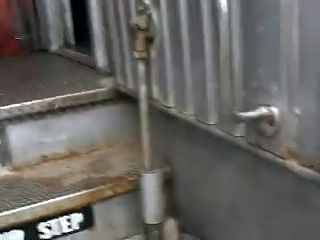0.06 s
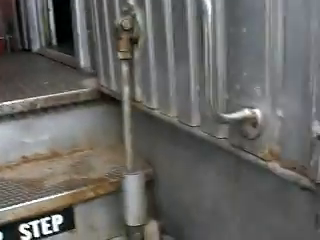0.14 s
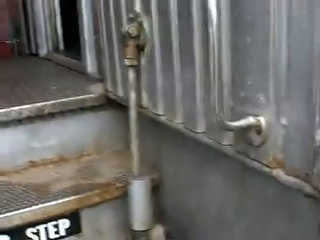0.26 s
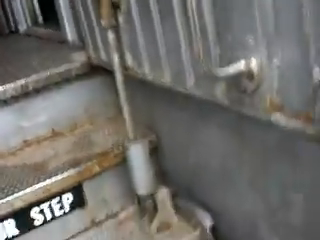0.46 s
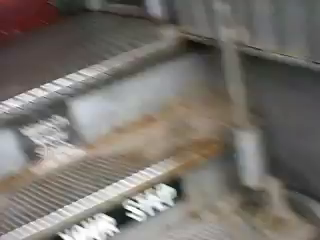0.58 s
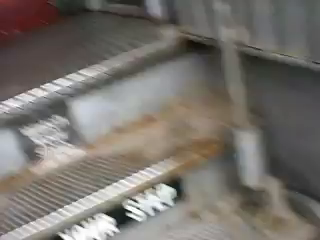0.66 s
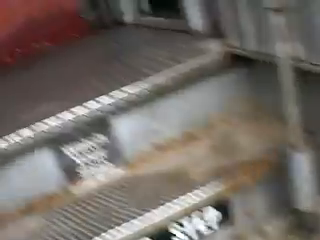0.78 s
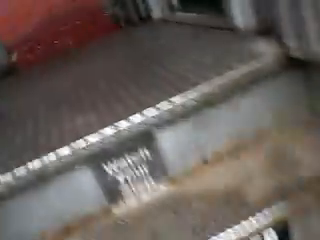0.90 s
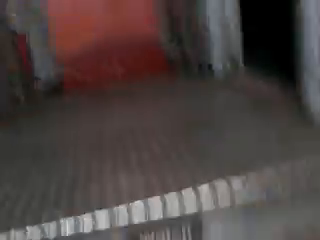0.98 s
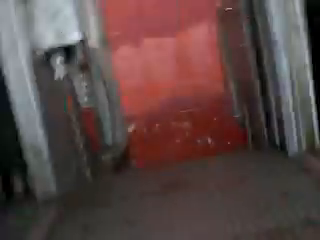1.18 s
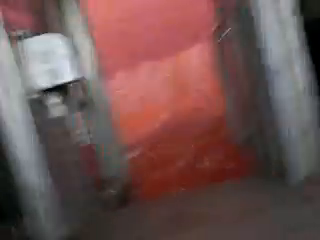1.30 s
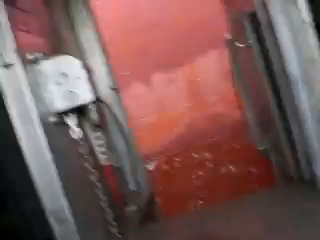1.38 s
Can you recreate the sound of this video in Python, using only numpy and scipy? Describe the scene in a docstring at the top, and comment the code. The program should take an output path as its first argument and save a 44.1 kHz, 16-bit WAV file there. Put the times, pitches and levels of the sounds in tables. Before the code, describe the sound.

Three close, ringing footsteps on metal as someone climbs aboard a train: a loud thud and clank, a softer footfall, then a clash with a small clink. The hollow stairwell booms low against a faint outdoor background.

```python
"""On the steel steps of a rail car, close by, someone climbs aboard.
A boot thuds onto the lowest step, which clanks; a lighter footfall follows on the next tread,
then the platform plate clashes and rings. Each hit is a noisy wash of dense steel modes plus a few
clear tones. The hollow stairwell booms under the weight; small ticks and rattles sound over
a faint hiss and outdoor background."""
import sys
import numpy as np
from scipy import signal
from scipy.io import wavfile
from scipy.ndimage import uniform_filter1d

SR = 44100
rng = np.random.default_rng(int(sys.argv[2]) if len(sys.argv) > 2 else 0)


def dump_mix(stems):
    """Bounce the given channels to the path in sys.argv[1] as a 16-bit WAV at rate SR."""
    frames = np.atleast_2d(stems).T  # one column per channel
    limited = np.clip(frames, -1, 1)  # hard clip at full scale
    pcm = np.round(limited * 32767).astype(np.int16)
    wavfile.write(sys.argv[1], SR, pcm)


N = 63945
TIME = np.arange(N) / SR

# The sole's thud, then the clank: start_s, attack_s, hold_s, crack_db, tail_db, decay_ratio
SOLE_HIT = (.223, .004, .02, -20, -22, .4)
STEP_HIT = (.2495, .0005, .003, 10.5, -12, 1.05)
# Their tone colours, per half octave: band_hz, level_db
SOLE_COLOUR = [(60, -48), (150, -32), (300, -27), (600, -29), (1200, -35), (2400, -50), (5000, -50),
               (11000, -64)]
STEP_COLOUR = [(60, -48), (110, -34), (190, -27), (330, -27), (600, -30.5), (950, -33), (1500, -28.5),
               (2400, -29.5), (5000, -36), (7500, -40), (11500, -56)]
# The step's clear ring: pitch_hz, relative_db, t60_s
STEP_MODES = [(141, -28, .9), (169, -24, .9), (180, -21, 1.0), (193, -24, 1.0), (279, -25, .75),
              (330, -28, .6), (410, -30, .8), (526, -26, .45), (577, -30, .7), (612, -26, .35),
              (813, -35, .6), (921, -33, .42), (1283, -33, .4), (1318, -25, .24), (1459, -27, .24),
              (1525, -26, .24), (1787, -30, .23), (2229, -29, .17), (3020, -39, .35), (3302, -33, .27),
              (5950, -42, .25), (7150, -38, .16)]
def lowest_step(bank):
    """The sole lands with a dull thud, then the steel step clanks under the boot."""
    impact = footfall(bank, SOLE_HIT, SOLE_COLOUR) + footfall(bank, STEP_HIT, STEP_COLOUR)
    return impact + ringing(STEP_HIT[0], STEP_MODES, attack_s=.003, lag_cycles=1.5, gain_db=-1.2)


# The lighter hit: start_s, attack_s, hold_s, crack_db, tail_db, decay_ratio
TREAD_HIT = (.792, .0012, .004, 0, -16, .77)
# Its tone colour: band_hz, level_db
TREAD_COLOUR = [(60, -55), (180, -36), (300, -41), (520, -36.5), (850, -33), (1400, -35), (2300, -36),
                (3500, -34.5), (5200, -42), (7500, -57), (11500, -68)]
# The tread's clear ring: pitch_hz, relative_db, t60_s
TREAD_MODES = [(183, -28, .6), (223, -29, .55), (396, -35, .65), (629, -34, .7), (826, -29, .27),
               (887, -33, .3), (1019, -34, .3), (1310, -33, .22), (1340, -29, .3), (1542, -35, .22),
               (1655, -33, .22), (2040, -39, .2), (2756, -39, .17), (3430, -32, .18)]
def next_tread(bank):
    """A lighter footfall sets the next tread ringing briefly."""
    impact = footfall(bank, TREAD_HIT, TREAD_COLOUR)
    return impact + ringing(TREAD_HIT[0], TREAD_MODES, attack_s=.005, gain_db=-.5)


# The clash: start_s, attack_s, hold_s, crack_db, tail_db, decay_ratio
PLATE_HIT = (1.035, .0015, .015, -6, -10, .88)
# Its tone colour: band_hz, level_db
PLATE_COLOUR = [(60, -54), (150, -39), (280, -27), (480, -29), (800, -28), (1300, -30), (2400, -36),
                (4200, -30), (6000, -32), (7800, -37), (10000, -32), (12000, -44)]
# The plate's clear ring: pitch_hz, relative_db, t60_s
PLATE_MODES = [(108, -31, 1.1), (151, -32, 1.4), (244, -26, .7), (258, -32, 1.0), (312, -25.5, 1.0),
               (348, -28, .8), (374, -27.5, .85), (457, -35, .9), (553, -28, .38), (791, -37, .55),
               (835, -29, .36), (881, -27, .42), (1240, -33, .22), (1312, -28, .24), (1394, -36, .4),
               (4864, -32, .16), (5135, -36, .18), (9687, -36, .18), (9880, -37, .19)]
def platform_plate(bank):
    """The boot strikes the plate: a bright clash, with low tones blooming after it."""
    impact = footfall(bank, PLATE_HIT, PLATE_COLOUR)
    return impact + ringing(PLATE_HIT[0], PLATE_MODES, attack_s=.002, lag_cycles=18, gain_db=-.5)


# Decay of the dense steel modes, scaled by each hit's decay_ratio: band_hz, base_t60_s
BODY_DECAY = [(100, .55), (300, .42), (700, .34), (1400, .32), (2800, .26), (5500, .2), (11000, .17)]
TAIL_DECAY = [(100, 1.8), (300, 1.55), (700, 1.08), (1400, .68), (2800, .3), (5500, .18), (11000, .12)]
def footfall(bank, hit, colour, crack_s=.003, lag_cycles=1.0):
    """A crack, then countless steel modes that die fast and leave a low tail; the lows build later."""
    start, attack, hold, crack_db, tail_db, decay_ratio = hit
    sample_age, out = since(start), 0
    age = sample_age[::16]  # envelopes move on a coarser time grid
    crack = from_db(crack_db) * np.exp(-age / crack_s)
    for hz, noise in bank:
        rise = 1 - np.exp(-age / (attack + lag_cycles / hz))
        body = decay(age - hold, decay_ratio * at_hz(BODY_DECAY, hz))
        tail = from_db(tail_db) * decay(age, decay_ratio * at_hz(TAIL_DECAY, hz))
        envelope = from_db(at_hz(colour, hz)) * rise * (np.hypot(body, tail) + crack)
        out += np.interp(sample_age, age, envelope) * noise[-len(sample_age):]
    return placed(out)


def ringing(start, modes, attack_s, gain_db, lag_cycles=0, waver_per_s=45, waver_radians=.55):
    """The clear modes of struck steel swell, waver slightly and ring out."""
    age, out = since(start), 0
    for hz, db, t60 in modes:
        waver = waver_radians * np.interp(age * waver_per_s, np.arange(200), rng.standard_normal(200))
        swell = 1 - np.exp(-age / (attack_s + lag_cycles / hz))
        envelope = from_db(db + gain_db) * swell * decay(age, t60)
        out += rng.choice([-1, 1]) * envelope * np.sin(2 * np.pi * hz * age + waver)
    return placed(out)


# Soft weight on the hollow steps: start_s, level_db, pitch_hz, swell_s
THUMPS = [(.048, -33, 150, .003), (.2245, -10, 255, .002), (.2405, -12, 190, .005),
          (.281, -18.5, 172, .009), (.462, -21, 180, .007), (.535, -31, 88, .012), (.582, -27, 190, .005),
          (.682, -24, 165, .005), (.665, -31, 95, .018), (.728, -29, 175, .008), (.8005, -17.5, 195, .007),
          (1.042, -19, 250, .004), (1.228, -36, 160, .014)]
def thumps():
    """A panel damped by the foot swings for a few cycles."""
    out = 0
    for start, db, hz, swell in THUMPS:
        age = since(start)
        envelope = from_db(db) * age / swell * np.exp(1 - age / swell)
        out -= placed(envelope * np.sin(2 * np.pi * hz * age))
    return out


# A clink and its bounce: start_s, level_db
CLINKS = [(1.046, -27), (1.076, -32)]
# Their high shimmer: pitch_hz, relative_db, t60_s
CLINK_MODES = [(5561, -1, .17), (5630, -5, .13), (5705, -5, .18)]
def clinks():
    """A small steel piece on the platform clinks and bounces once."""
    return sum(ringing(start, CLINK_MODES, attack_s=.001, gain_db=db) for start, db in CLINKS)


# Dry handling ticks: start_s, level_db, centre_hz, t60_s, half_width_octaves
TICKS = [(.1275, -31, 680, .024, .5), (.1275, -35, 1400, .009, .9), (.897, -37, 1700, .016, .8),
         (.9425, -37, 2750, .018, .3), (.943, -45, 5000, .012, .6), (1.0198, -26, 2400, .008, .9),
         (1.0205, -33, 600, .08, .8), (1.028, -29, 700, .08, .9), (1.027, -43, 5000, .08, 1.0),
         (1.427, -40, 750, .03, .35), (1.427, -38, 2200, .009, .7)]
def ticks():
    """Tiny dry contacts, each a noise burst through one broad resonance."""
    out = 0
    for start, db, hz, t60, octaves in TICKS:
        edges = [hz / 2 ** octaves, hz * 2 ** octaves]
        burst = rng.standard_normal(N) * placed(decay(since(start), t60)) + 1e-18
        tick = signal.lfilter(*signal.butter(2, edges, "band", fs=SR), burst)
        makeup_gain = np.sqrt(SR / 2 / np.diff(edges))
        out += from_db(db) * makeup_gain * tick
    return out


# Knocks of a loose fixture: start_s, level_db
RATTLES = [(.373, -39), (.412, -49), (.481, -51), (.497, -49), (.512, -48)]
# Their chatter: band_hz, relative_db
RATTLE_COLOUR = [(600, -16), (1500, -9), (2900, 0), (4500, -14), (7000, -16), (11000, -32)]
# The fixture's own ring: pitch_hz, relative_db, t60_s
RATTLE_MODES = [(3020, -6, .13), (6950, -13, .07)]
def rattles(bank, t60_s=.11):
    """A loose fixture chatters after the first step, with a short metallic ring."""
    envelope = sum(from_db(db) * placed(decay(since(start), t60_s)) for start, db in RATTLES)
    chatter = envelope * steady(bank, RATTLE_COLOUR)
    ring = sum(ringing(start, RATTLE_MODES, attack_s=.001, gain_db=db) for start, db in RATTLES)
    return chatter + ring


# Fader ride of the boom: time_s, level_db
BOOM_FADER = [(0, -42), (.06, -42), (.11, -53), (.16, -45), (.2, -46), (.35, -39), (.55, -36), (.72, -36),
              (.9, -41), (1.1, -41), (1.27, -47), (1.45, -54)]
# Its bass-heavy colour: band_hz, relative_db
BOOM_COLOUR = [(30, -42), (45, -30), (65, -7), (95, 0), (135, -4), (195, -5), (290, -16), (450, -22),
               (900, -34)]
def stairwell_boom(bank):
    """The hollow stairwell rumbles under the weight."""
    # Reversing the noise keeps it independent of the footfalls.
    rumble = sum(from_db(at_hz(BOOM_COLOUR, hz)) * noise[::-1] for hz, noise in bank)
    return fader(BOOM_FADER) * rumble


# Fader ride of the hiss: time_s, level_db
HISS_FADER = [(0, -61), (.12, -53), (.2, -53), (.25, -65), (.42, -81), (.55, -80), (.7, -63), (.78, -62),
              (1.0, -68), (1.18, -68), (1.26, -62), (1.36, -61), (1.45, -67)]
# Its airy colour: band_hz, relative_db
HISS_COLOUR = [(800, -8), (2500, -1), (4500, 1), (7500, -1), (9500, 0), (12000, -6)]
def hiss(bank):
    """A faint, bright hiss swells; then the level dips and slowly recovers."""
    return fader(HISS_FADER) * steady(bank, HISS_COLOUR)


# The outdoor bed: band_hz, level_db
OUTDOOR_COLOUR = [(30, -82), (100, -62), (300, -60), (700, -58.5), (1400, -58.5), (2800, -63.5),
                  (5000, -71), (11000, -86)]
def outdoors(bank):
    """The far background is a soft, even wash."""
    return steady(bank, OUTDOOR_COLOUR)


def noise_bands():
    """Half-octave noises of rms 1 with their slow swings evened out: centre_hz, noise."""
    edges_hz = 12800 / 2 ** np.arange(9, -.1, -.5)
    bank = []
    for low, high in zip(edges_hz, edges_hz[1:]):
        bandpass = signal.butter(3, [low, high], "band", fs=SR, output="sos")
        noise = signal.sosfilt(bandpass, rng.standard_normal(N + 8000))  # pre-roll settles the filter
        power = uniform_filter1d(noise ** 2, int(SR * max(.012, 2.5 / (high - low))))
        levelled = noise / np.sqrt(power + 1e-18)
        bank.append((np.sqrt(low * high), levelled[-N:]))
    return bank


def steady(bank, colour):
    """Steady noise of a given colour, shifted in time at random."""
    return np.roll(sum(from_db(at_hz(colour, hz)) * noise for hz, noise in bank), rng.integers(N))


def from_db(db):
    """Decibels to gain."""
    return 10 ** (db / 20)


def fader(points):
    """Gain gliding through points of time_s, level_db."""
    return from_db(np.interp(TIME, *np.transpose(points)))


def at_hz(points, hz):
    """Read a table on a log-frequency axis."""
    frequencies, values = np.transpose(points)
    return np.interp(np.log(hz), np.log(frequencies), values)


def decay(age, t60):
    """Full level until age zero, then 60 dB down per t60."""
    return from_db(-60 * np.maximum(age, 0) / t60)


def since(start):
    """Seconds since an event, for the samples from its start on."""
    return TIME[:N - int(start * SR)]


def placed(sound):
    """Pad an event with the silence before it."""
    return np.pad(sound, (N - len(sound), 0))


def scene():
    """Three steps up, with small details and ambience around them, in mono."""
    bank = noise_bands()
    steps = lowest_step(bank) + next_tread(bank) + platform_plate(bank) + thumps()
    details = clinks() + ticks() + rattles(bank)
    ambience = stairwell_boom(bank) + hiss(bank) + outdoors(bank)
    return (steps + details + ambience)[None]


def record(dry):
    """The small microphone loses the deep bass, the loudest peaks are flattened and the top is cut."""
    low_cut_hz, clip_level, high_cut_hz = 55, .36, 12200
    thin = signal.sosfilt(signal.butter(2, low_cut_hz, "high", fs=SR, output="sos"), dry)
    flattened = thin / (1 + (thin / clip_level) ** 6) ** (1 / 6)
    return signal.sosfilt(signal.ellip(10, .2, 70, high_cut_hz, fs=SR, output="sos"), flattened)


dry = scene()
out = record(dry)
dump_mix(out)
```